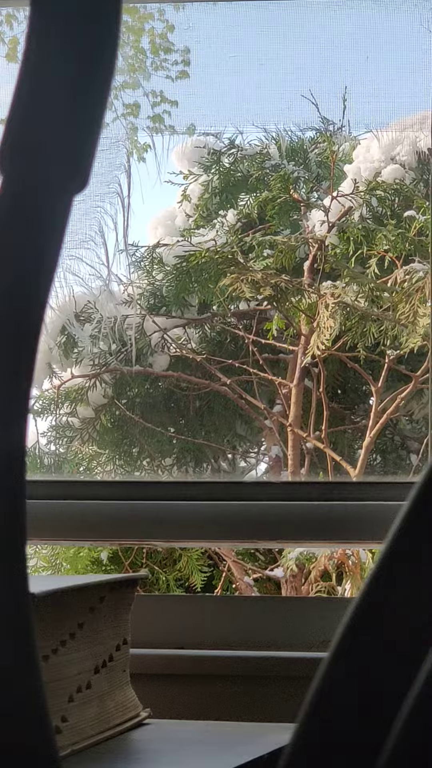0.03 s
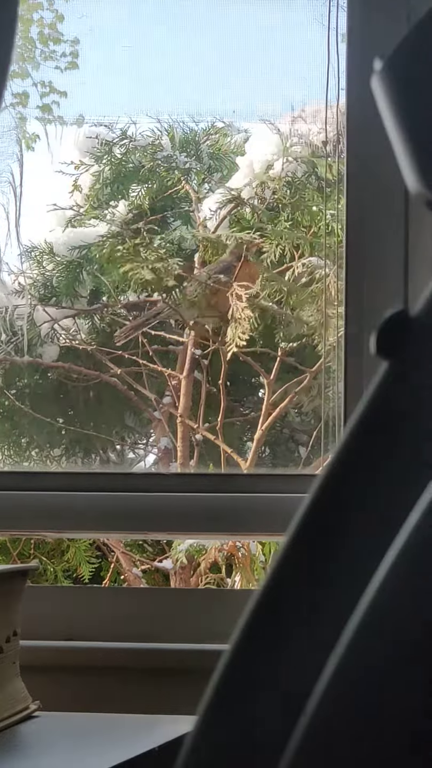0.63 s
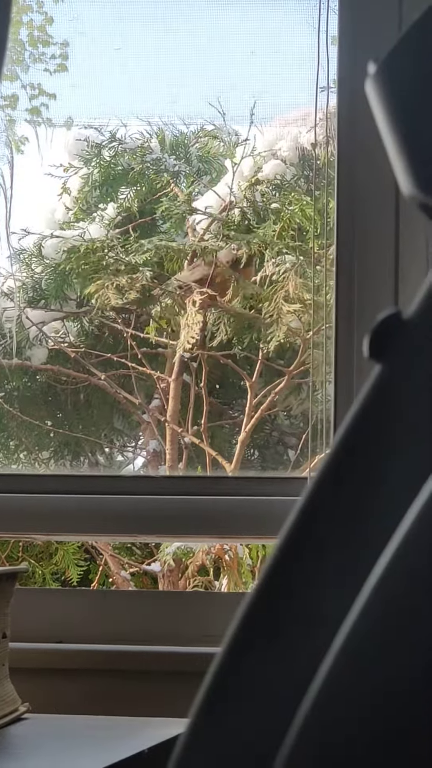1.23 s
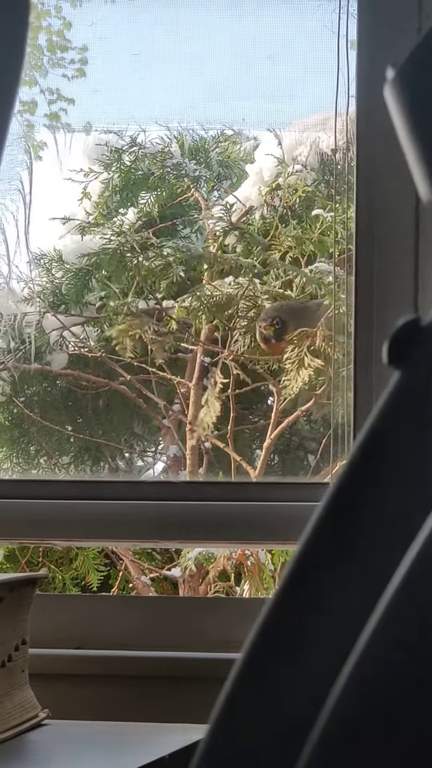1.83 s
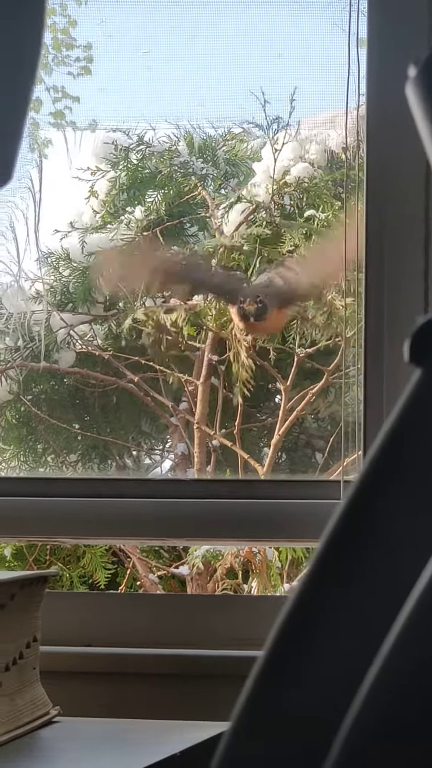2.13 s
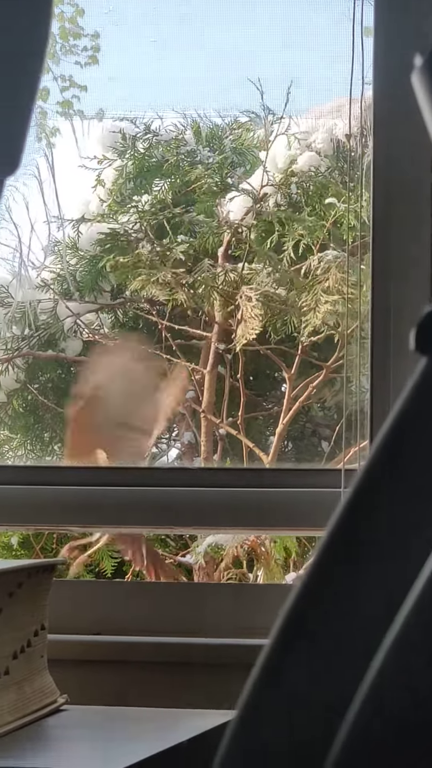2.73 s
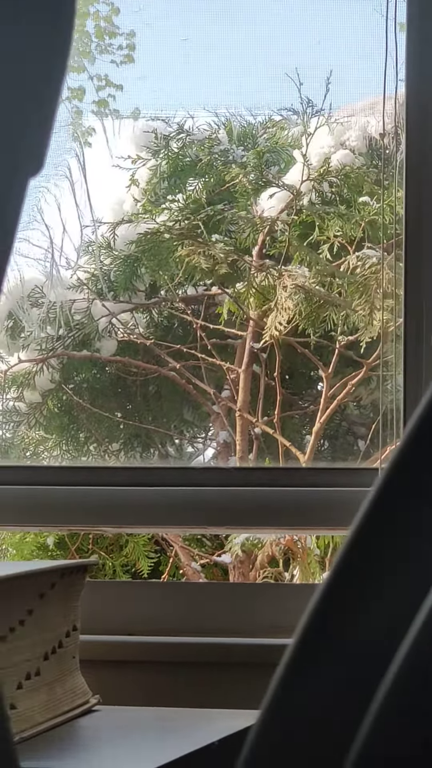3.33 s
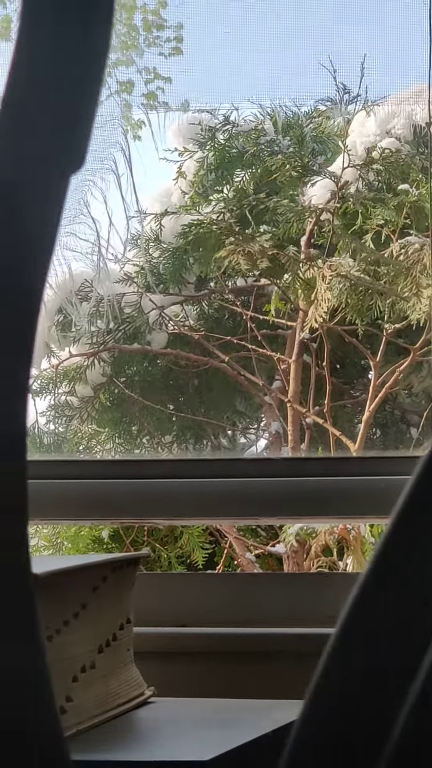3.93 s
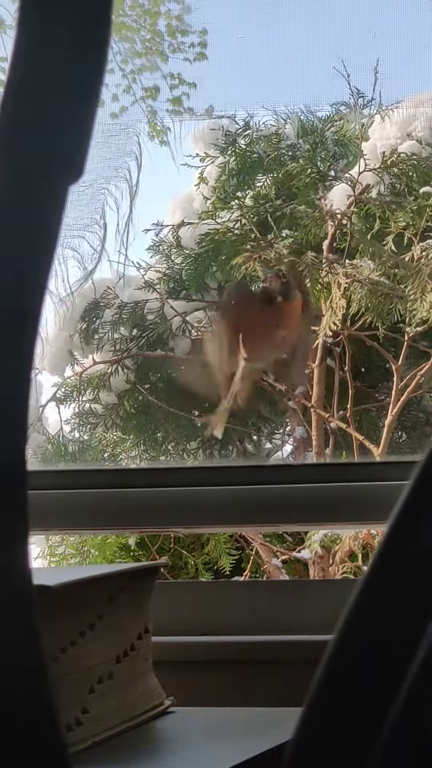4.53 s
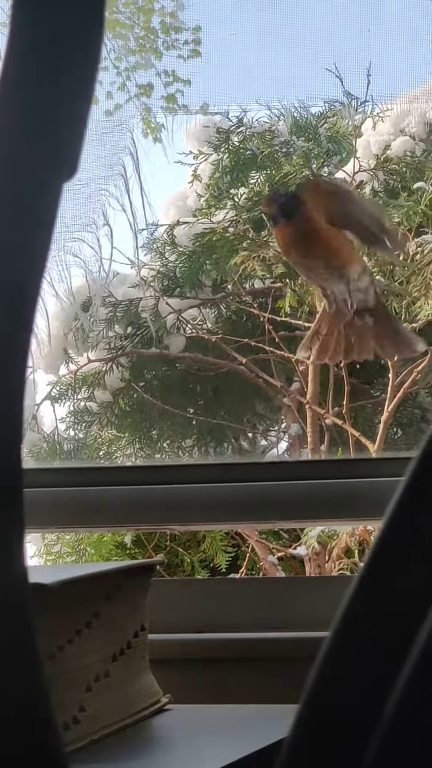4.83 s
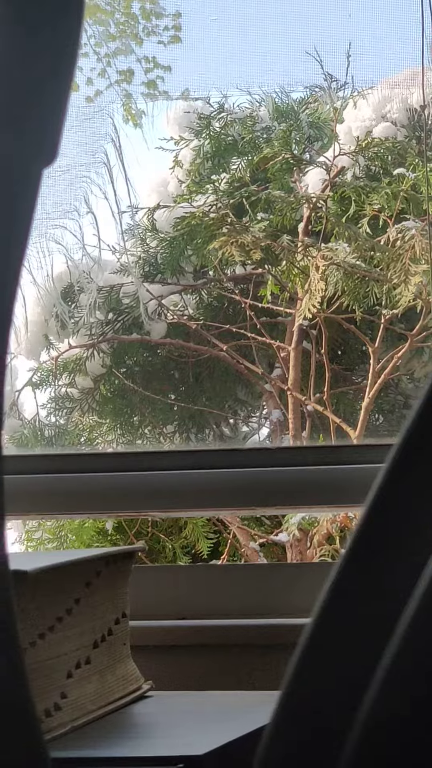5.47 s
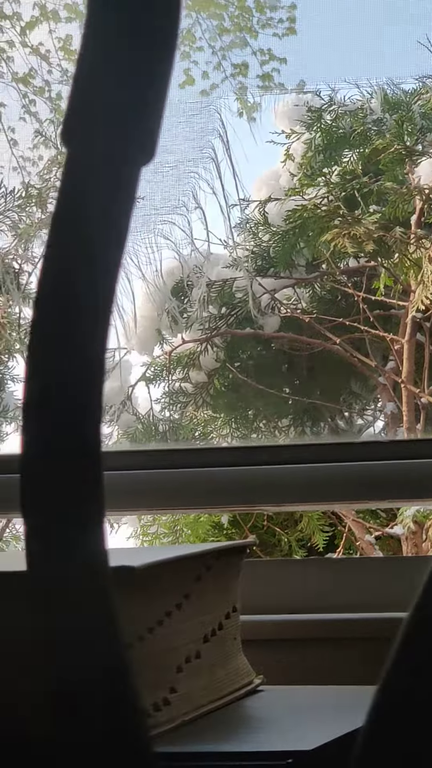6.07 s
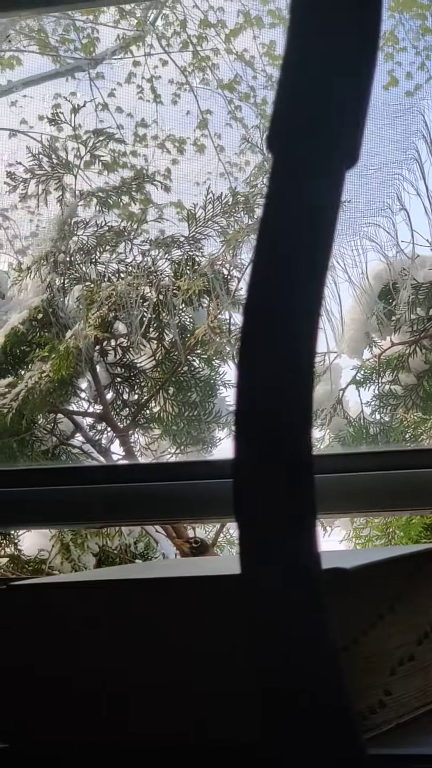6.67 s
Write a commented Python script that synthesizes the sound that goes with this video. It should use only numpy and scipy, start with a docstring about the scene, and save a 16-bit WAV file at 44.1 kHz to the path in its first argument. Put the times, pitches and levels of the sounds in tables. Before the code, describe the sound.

Heard from a hushed room, a bird hits the windowpane once, then twice more, with short ringing thuds and soft wing brushes.

```python
"""A small quiet room, the stereo microphone indoors, a robin flying three times against the window.
From beyond the glass come the rustle of the hedge and a bird's thin, faint whistles. Then the blows,
much louder: each rings the pane, thuds in the wall and rattles the sash. Feathers brush the glass,
claws scratch the sash once, and the wingbeats press on the pane, which slowly pumps the room's air."""
import sys
import numpy as np
from scipy import signal
from scipy.fft import rfft, irfft, next_fast_len
from scipy.io import wavfile
from scipy.ndimage import uniform_filter1d

SR = 44100
rng = np.random.default_rng(int(sys.argv[2]) if len(sys.argv) > 2 else 0)


def materialize(psi):
    """Save the field psi as 16-bit PCM at rate SR to the path in sys.argv[1].

    A 1-D psi becomes a single channel; in a 2-D psi each row is a channel.
    """
    bounded = np.clip(np.atleast_2d(psi).T, -1, 1)
    quanta = np.round(bounded * 32767).astype(np.int16)
    wavfile.write(sys.argv[1], SR, quanta)


N = 295470
TIME = np.arange(N) / SR
RING_TIME = TIME[:2 ** 15]

# The room's hush. Each row: frequency in Hz, relative level in dB.
HUSH_COLOUR = [(12, -28.5), (20, 5), (34, -1), (53, -10.5), (130, -19), (220, -24.5), (291, -22),
               (325, -23.5), (523, -28), (730, -29.5), (1830, -35), (2050, -33.5), (2290, -35),
               (7390, -44.5), (15700, -35.5)]
# Diffuse sound at the microphone. Each row: frequency in Hz, left-right correlation.
DIFFUSE_LIKENESS = [(30, 0), (150, 0.7), (400, 0.08), (1000, 0.06), (15000, 0.01)]
# Dry little ticks. Each row: start in seconds, level in dB.
TICKS = [(0.3083, -42), (.3695, -44.5), (0.4092, -44.5), (5.387, -38)]
# The hedge outside as the bird moves in it. Each row: loudest moment in seconds, level in dB,
# half-width in seconds, thinning of the lows in dB.
HEDGE_STIRS = [(.66, -67.5, 0.3, -3.5), (1.7, -60, .15, 15), (2.12, -65.5, 0.54, -3.5),
               (2.79, -63.5, 0.091, -9)]
# Leaves heard through glass. Each row: frequency in Hz, relative level in dB.
LEAF_COLOUR = [(150, 8.5), (400, 5), (1000, 1.5), (2000, 0.5), (3800, -0.5), (5700, -6), (7800, -5),
               (10000, -9), (15000, -3.5)]
# Whistles outside. Each row: start and length in seconds, first and last pitch in Hz, level in dB,
# rasp as a share of the pitch.
WHISTLES = [(1.318, 0.075, 5950, 3800, -69, .07), (1.413, .2, 4940, 4760, -68, .002),
            (1.92, .17, 5700, 5920, -74, .002), (3.08, 0.13, 3700, 3300, -76, 0.033)]
# Wing and tail on the glass. Each row: start in seconds, level in dB, length in seconds,
# tilt in dB per octave.
BRUSHES = [(2.151, -61, 0.029, -1.5), (2.355, -62, .03, -4), (2.3934, -43.5, 0.014, -1),
           (2.406, -39, 0.025, -3), (2.517, -51, 0.027, 0), (2.629, -57.5, 0.011, -3.5),
           (2.673, -55.5, 0.056, -8.5), (2.732, -56.5, 0.044, -12.5), (3.022, -63, 0.03, 1),
           (4.125, -69, 0.023, -0.5), (4.363, -60, 0.027, -2), (4.41, -48, 0.018, -1.5),
           (4.587, -48, 0.017, -1.5), (4.647, -46.5, 0.014, -1), (4.714, -48, 0.016, -1),
           (4.786, -48.5, 0.027, 2), (4.872, -54, .02, -3), (4.941, -49, 0.02, -1)]
# A feather's touch. Each row: frequency in Hz, relative level in dB.
FEATHER_COLOUR = [(240, 4), (500, 1.5), (900, 5), (1400, 3.5), (2500, 1), (5000, -2), (7500, -5.5),
                  (11000, -11), (15000, -9)]
# Knocks at the window, heard from the room. Each row: frequency in Hz, left-right correlation.
KNOCK_LIKENESS = [(150, 0.99), (400, 0.105), (700, 0.8), (1100, -0.23), (2000, -0.045), (15000, 0)]
# The room's reverberation. Each row: frequency in Hz, seconds to fall 60 dB.
ROOM_T60 = [(120, 0.27), (300, 0.3), (700, 0.34), (2500, 0.31), (6000, 0.22), (14000, 0.16)]
# Hard flapping at the window. Each row: start and length in seconds, pumped air in dB, rustle in dB.
FLAPPING_BOUTS = [(2.366, .28, -30.5, -71), (4.385, 0.25, -28.5, -59), (5.122, 0.054, -29.5, -75.5)]
# Air pumped by the pane. Each row: frequency in Hz, relative level in dB.
WING_AIR_COLOUR = [(6, -10.5), (13, 4), (22, -4.5), (32, -16), (41, -28.5), (56, -25.5), (75, -39),
                   (130, -50)]
# The bird's body hits. Each row: start in seconds, ring in dB, spot from middle (0) to edge (1),
# thud in dB, rattle in dB, lag of breast behind head in seconds, the breast's share,
# share of the free ring time (less where the body stays on the glass).
BLOWS = [(2.406, 6.5, 0.16, -24, -35, 0.0053, 0.2, 0.93), (2.465, -17, 0.7, -43, -57, 0.0032, 0, 0.42),
         (4.4326, 5, 1, -28.5, -35, 0.00456, 0.17, 0.86), (4.7664, 2, 0.22, -29, -36.5, 0.003, 0.24, 0.89)]
# The pane in its frame. Each row: frequency in Hz, seconds to fall 60 dB when free,
# level in dB struck in the middle, the same at the edge, left minus right in dB.
PANE_MODES = [(112.4, 0.73, -45.5, -47, 0), (124.2, 0.6, -41, -39.5, -1), (166.8, 0.32, -32, -54, -2),
              (198.6, 0.44, -20.5, -34.5, -0.5), (235, 0.362, -38, -51.5, -3.5),
              (258, 0.33, -35.5, -41, -2), (272.4, .35, -38.5, -32.5, 2), (320.2, .25, -23, -35.5, -1.5),
              (337.4, 0.22, -20.5, -48.5, -7), (437, .27, -27.5, -25.5, 0), (492, 0.23, -47.5, -40.5, -0.5),
              (509, 0.4, -54.5, -37.5, -3.5), (579.6, 0.23, -26, -31, 7), (633, 0.29, -39, -44, 4.5),
              (631, 0.39, -36, -44, 2), (688, 0.24, -38, -62.5, 3.5), (737, 0.32, -43, -38, 1),
              (758.6, 0.18, -41, -63.5, 8), (891, 0.377, -38.5, -43.5, -8), (940, .25, -47, -54, -8),
              (1012, 0.15, -50.5, -49, -3.5), (1487, 0.33, -56.5, -48.5, -3.5),
              (2136, .22, -49.5, -49.5, -3), (2300, 0.11, -45, -41.5, -12.5)]
# The pane's phase at the microphone. Each row: frequency in Hz, lead of the left side in radians.
LEFT_LEAD = [(120, 0), (200, 0.28), (320, -0.75), (436, 1.1), (576, 0.23), (750, 1.6), (900, 2.5),
             (2250, -0.5)]
# Dense ring of wall and frame. Each row: frequency in Hz, relative level in dB.
THUD_COLOUR = [(90, -22), (140, 4.5), (300, -0.5), (650, -2), (900, -10), (1250, -17.5), (1800, -30.5),
               (3000, -47)]
# Chatter of the sash. Each row: frequency in Hz, relative level in dB.
RATTLE_COLOUR = [(600, -19.5), (1200, 4.5), (1600, -6.5), (2150, 2.5), (2650, 0.5), (3200, 0.5),
                 (3900, -7.5), (5400, -3), (6500, -24), (9000, -26), (15000, -34)]
# Claws on the sash. Each row: frequency in Hz, relative level in dB.
CLAW_COLOUR = [(1300, -7.5), (1450, 2.5), (1750, -11), (1980, -3), (2130, 3.5), (2300, -6), (3050, -10),
               (3360, -1), (3650, -17), (5000, -26)]


def undb(db):
    """Decibels to gain."""
    return 10 ** (np.asarray(db) / 20)


def at_hz(points, hz):
    """Read (Hz, value) points on a log-frequency axis."""
    freqs, values = np.transpose(points)
    return np.interp(np.log(np.maximum(hz, 1)), np.log(freqs), values)


def unit(x):
    """Scale to rms 1."""
    return x / np.sqrt(np.mean(x ** 2))


def pan(db):
    """Left and right gains for a level difference."""
    return undb(np.array([[db], [-db]]) / 2)


def add(out, start, sound):
    """Mix a sound in at a start in seconds."""
    i = int(start * SR)
    out[:, i:i + sound.shape[1]] += sound[:, :N - i]


def noise(colour, size, likeness=DIFFUSE_LIKENESS):
    """Coloured stereo noise; likeness sets how alike it reaches the microphone's two sides."""
    n = next_fast_len(size, real=True)
    hz = np.arange(n // 2 + 1) * SR / n
    mid, side = rfft(rng.standard_normal((2, n)))
    alike = np.clip(at_hz(likeness, hz), -.999, .999)
    roll_off = np.minimum(hz / colour[0][0], 1) ** 2 / np.maximum(hz / colour[-1][0], 1) ** 4
    pair = mid * np.sqrt(1 + alike) + side * np.sqrt(1 - alike) * np.array([[1], [-1]])
    return unit(irfft(pair * undb(at_hz(colour, hz)) * roll_off, n)[:, :size])


def room_hush(db=-58.5):
    """The low, steady hush all round the microphone."""
    return undb(db) * noise(HUSH_COLOUR, N)


def ticks(relax_s=0.0036, soft_hz=7000):
    """Tiny, slightly rounded steps in the level, with no ring and no room on them."""
    out = np.zeros((2, N))
    for start, db in TICKS:
        add(out, start, -undb(db) * np.exp(-RING_TIME / relax_s)[None])
    return signal.sosfilt(signal.butter(1, soft_hz, fs=SR, output="sos"), out)


def mic_settling(start_s=.315, rise_s=0.054, swing_hz=0.38, decay_s=0.35, offset_s=2.6):
    """A slow subsonic swing as the microphone settles after switching on."""
    t = np.maximum(TIME - start_s, 0)
    swing = undb(-22) * np.exp(-t / decay_s) * np.cos(2 * np.pi * swing_hz * t)
    offset = 0.0065 * np.exp(-(t / offset_s) ** 4)
    return (swing - offset) * (1 - np.exp(-t / rise_s))


def flapping(start, length, fade_db_per_s, approach_db_per_s=131):
    """Gain of one bout of flapping: it swells as the bird nears, holds at the glass, fades as it leaves."""
    before = np.maximum(start - TIME, 0)
    after = np.maximum(TIME - start - length, 0)
    return undb(-approach_db_per_s * before - fade_db_per_s * after)


def rustle(flicker_db=0.5, split_hz=1200, feather_lag_s=0.12, feather_lows_db=11):
    """Beyond the glass the hedge hisses in soft swells; a duller feather rustle trails the flapping."""
    highs, lows = [], []
    for peak_s, db, width, thinning_db in HEDGE_STIRS:
        swell = undb(db) / np.cosh(np.minimum(abs(TIME - peak_s) / width, 20))
        highs.append(swell)
        lows.append(swell * undb(-thinning_db))
    for start, length, _, db in FLAPPING_BOUTS:
        swell = undb(db) * flapping(start + feather_lag_s, length, fade_db_per_s=23)
        highs.append(swell)
        lows.append(swell * undb(feather_lows_db))
    flicker = unit(noise([(3, 2.5), (15, 1), (40, -7.5)], N)[0])
    hiss = noise(LEAF_COLOUR, N)
    low = signal.sosfiltfilt(signal.butter(1, split_hz, fs=SR, output="sos"), hiss)
    swelling = low * np.linalg.norm(lows, axis=0) + (hiss - low) * np.linalg.norm(highs, axis=0)
    return swelling * undb(flicker_db * flicker)


def whistles(trill_db=4.0, smear_s=0.019):
    """Outside, thin trilling notes glide and swell, smeared by reflections from hedge and wall."""
    out = np.zeros((2, N))
    wobble, trill = noise([(30, -14), (120, -1), (300, -15)], N, likeness=[(20, 0), (200, 0)])
    for start, length, first_hz, last_hz, db, rasp in WHISTLES:
        n = int(length * SR)
        hz = np.geomspace(first_hz, last_hz, n) * (1 + rasp * wobble[:n])
        tone = np.sin(2 * np.pi * np.cumsum(hz) / SR)
        swell = np.sqrt(np.sin(np.pi * np.arange(n) / n))
        add(out, start, (swell * undb(db + trill_db * trill[:n]) * tone)[None])
    echoes = rng.standard_normal((2, len(RING_TIME))) * np.exp(-RING_TIME / smear_s)
    return signal.fftconvolve(out, unit(echoes) / np.sqrt(len(RING_TIME)), axes=1)[:, :N]


def room_ring(colour, early_db, early_s=0.0043):
    """Countless window and room modes: a strong early sound, then octaves dying at the room's pace."""
    n = len(RING_TIME)
    spectrum = rfft(noise(colour, n, likeness=KNOCK_LIKENESS))
    hz = np.arange(n // 2 + 1) * SR / n
    octave = np.log2(np.clip(hz, 2 ** 7, 2 ** 14))
    out = 0
    for centre in range(7, 15):
        band = irfft(spectrum * np.maximum(1 - abs(octave - centre), 0), n)
        out = out + band * np.exp(-np.log(1000) * RING_TIME / at_hz(ROOM_T60, 2 ** centre))
    return out * (1 + undb(early_db) * np.exp(-RING_TIME / early_s))


def scrape(body, length_s, per_s, scatter_db, rise_s=0.0024):
    """A burst of tiny contacts that starts quickly and dies away, each ringing the body."""
    t = RING_TIME[:len(RING_TIME) // 4]
    chance, size = rng.random(len(t)), rng.standard_normal(len(t))
    contacts = (chance < per_s / SR) * np.sign(size) * undb(scatter_db * abs(size))
    contacts = contacts * (1 - np.exp(-t / rise_s)) * np.exp(-(t / length_s) ** 2)
    contacts = contacts / np.sqrt(np.sum(contacts ** 2) + 1e-12)
    return signal.fftconvolve(body, contacts[None], axes=1)


def feather_brushes():
    """Feather barbs flick over the far side of the glass."""
    out = np.zeros((2, N))
    for start, db, length, tilt in BRUSHES:
        colour = [(hz, level + tilt * np.log2(hz)) for hz, level in FEATHER_COLOUR]
        touch = room_ring(colour, early_db=1.5)
        add(out, start, undb(db) * scrape(touch, length, per_s=2000, scatter_db=6.5, rise_s=0.0031))
    return out


def wingbeats(even_s=.15):
    """Uneven wingbeats press on the pane, which pumps the room's air at the microphone."""
    air = noise(WING_AIR_COLOUR, N, likeness=[(10, 1.0), (100, .97)])
    running_rms = np.sqrt(uniform_filter1d(np.mean(air ** 2, axis=0), int(even_s * SR)))
    bouts = [undb(db) * flapping(start, length, fade_db_per_s=43)
             for start, length, db, _ in FLAPPING_BOUTS]
    return air / running_rms * np.linalg.norm(bouts, axis=0)


def pane_ring(spot, ring_share, build_cycles=1.6, build_s=.003):
    """The glass modes; the spot struck sets their shares, and low ones take longer to build."""
    out = 0
    for k, (hz, t60, middle_db, edge_db, pan_db) in enumerate(PANE_MODES):
        lead = at_hz(LEFT_LEAD, hz) * np.array([[1], [-1]]) / 2
        swell = 1 - np.exp(-RING_TIME / (build_s + build_cycles / hz))
        decay = np.exp(-np.log(1000) * RING_TIME / (t60 * ring_share))
        gain = undb(middle_db + spot * (edge_db - middle_db)) * pan(pan_db)
        out = out + (-1) ** k * gain * swell * decay * np.sin(2 * np.pi * hz * RING_TIME + lead)
    return out


def blows(thud_rise_s=0.0049, flex_s=.002):
    """Head, then breast, ring the pane; the wall thuds and, once the glass has flexed, the sash chatters."""
    out = np.zeros((2, N))
    for start, ring_db, spot, thud_db, rattle_db, breast_lag, breast_share, ring_share in BLOWS:
        ring = undb(ring_db) * pane_ring(spot, ring_share)
        add(out, start, ring)
        add(out, start + breast_lag, breast_share * ring)
        thud = room_ring(THUD_COLOUR, early_db=-6.5) * (1 - np.exp(-RING_TIME / thud_rise_s))
        add(out, start, undb(thud_db) * thud)
        sash = room_ring(RATTLE_COLOUR, early_db=-1.5)
        chatter = scrape(sash, length_s=0.0225, per_s=1100, scatter_db=4.5)
        add(out, start + flex_s, undb(rattle_db) * pan(-2.56) * chatter)
    return out


def claws(start_s=2.628, db=-57.5, attack_s=0.01, fade_db_per_s=61, flicker_db=1.5):
    """One faint ringing scratch on the sash, dying away in fits as the bird slides down."""
    t = np.maximum(TIME - start_s, 0)
    fits = noise([(10, 1), (40, 0), (120, -14.0)], N)[0]
    attack = 1 - np.exp(-t / attack_s)
    return noise(CLAW_COLOUR, N) * attack * undb(db - fade_db_per_s * t + flicker_db * fits)


def scene():
    """From inside the room: its hush, the hedge outside and the bird at the window."""
    return (room_hush() + ticks() + rustle() + whistles()
            + feather_brushes() + wingbeats() + blows() + claws())


def record(dry, opens_s=0.18, rise_s=.08, top_hz=15900):
    """The phone's microphone fades in, settles and cuts the top."""
    fade_in = 1 - np.exp(-np.maximum(TIME - opens_s, 0) / rise_s)
    top_cut = signal.ellip(10, .1, 80, top_hz, fs=SR, output="sos")
    return signal.sosfilt(top_cut, dry * fade_in + mic_settling())


dry = scene()
out = record(dry)
materialize(out)
```